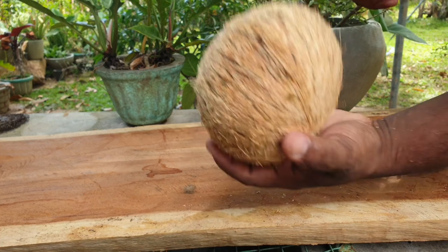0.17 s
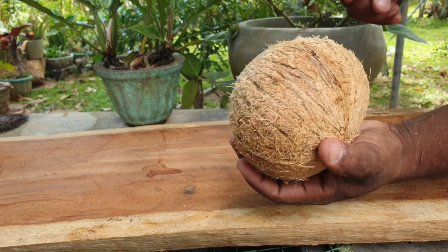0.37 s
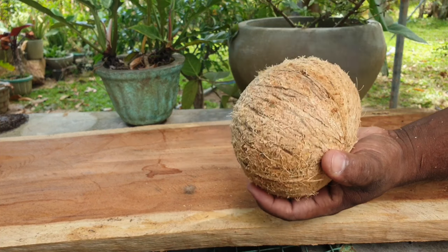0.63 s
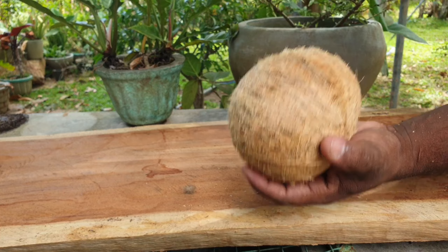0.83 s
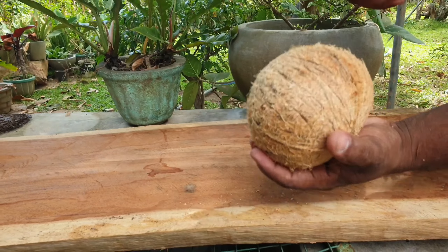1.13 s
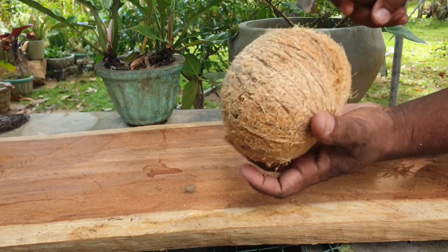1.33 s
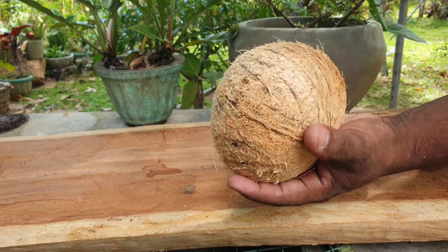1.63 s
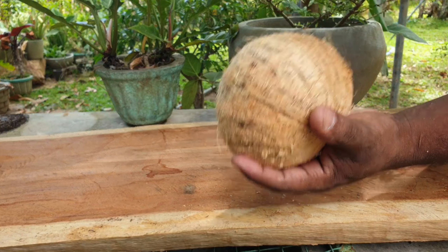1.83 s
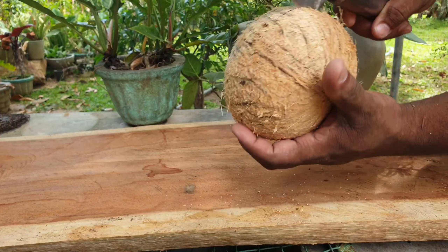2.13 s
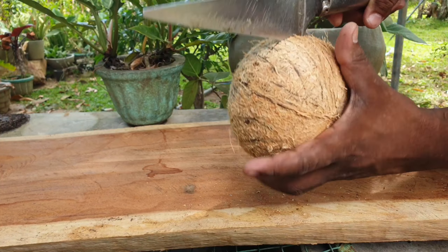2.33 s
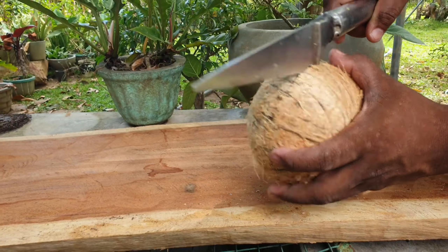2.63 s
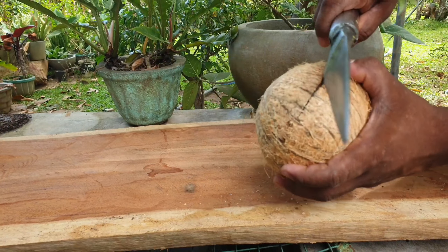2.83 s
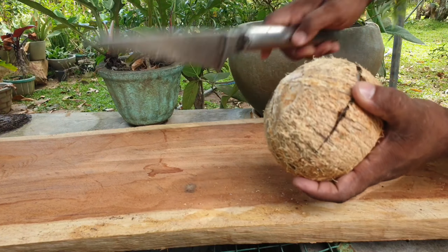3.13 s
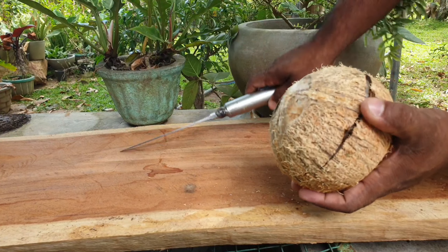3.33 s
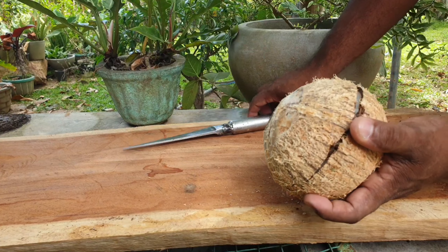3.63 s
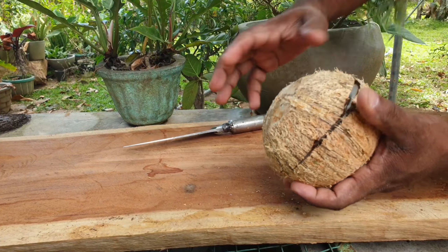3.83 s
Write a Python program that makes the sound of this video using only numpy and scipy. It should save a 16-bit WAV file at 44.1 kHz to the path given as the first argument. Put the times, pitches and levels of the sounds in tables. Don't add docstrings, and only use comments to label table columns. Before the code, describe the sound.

Two loud knife blows crack a coconut, followed by creaks, scrapes and a knife knocking on wood

```python
import sys
import numpy as np
from scipy import signal
from scipy.fft import rfft, irfft
from scipy.io import wavfile
from scipy.ndimage import uniform_filter1d

SR = 44100
rng = np.random.default_rng(int(sys.argv[2]) if len(sys.argv) > 2 else 0)


def digitize_waveform(pressure):
    field = np.atleast_2d(pressure).T
    bounded = np.clip(field, -1, 1)
    quanta = np.round(bounded * 32767).astype(np.int16)
    wavfile.write(sys.argv[1], SR, quanta)


def volts(x):
    e = np.asarray(x, float) / 20
    return 10 ** e


N = 176400

# pitch_hz, level_db
HUSH_COLOUR = [(30, -7), (65, 6.5), (130, 0), (300, -15.5), (2600, -24), (3500, -33.5), (6000, -26),
               (15000, -37)]
# time_s, level_db
LEAF_BREEZE = [
    (0, -1),
    (.5, -4),
    (.8, -2.5),
    (1.5, -0.5),
    (1.849, -3.5),
    (2.399, 0.5),
    (3.0, -2.5),
    (4.0, 4),
]
# start_s, length_s, level_db
ENGINE_SWELLS = [
    (-.05, 0.39, -46.5),
    (0.553, 0.25, -47),
    (1.122, 0.16, -48),
    (1.577, 0.13, -51),
    (1.791, 0.37, -45),
    (2.338, 0.29, -49.5),
    (2.938, 0.099, -47.5),
    (3.384, 0.14, -45),
]
# pitch_hz, level_db, t60_s
OLD_RINGING = [(315.5, -73, 0.117), (350, -71, .15), (775, -75.5, .08), (1823, -78.5, .05),
               (2343, -71, 0.077), (2610, -76.5, 0.037)]
# pitch_hz, level_db
EARLY_ECHO_COLOUR = [(100, -12.5), (500, -3), (1400, -7), (2500, -1.5), (6000, -3.5), (16000, -7)]
# pitch_hz, level_db
LATE_ECHO_COLOUR = [(100, -5.5), (350, -2), (900, -3.5), (1400, -9), (2400, -0.5), (4000, -3), (7000, -7.5),
                    (16000, -10.5)]
# start_s, length_s, level_db, pitch_hz
CREAKS = [
    (0.27, 0.042, -63, 620),
    (2.822, 0.081, -61, 640),
    (2.878, 0.064, -47, 657),
    (3.034, 0.027, -53.5, 582),
]
# start_s, crack_db, knock_db, contact_ms
AIM_TOUCH = (0.63, -46, -32.5, .12)
# pitch_hz, level_db, t60_s
AIM_TONES = [(322, -9, .2), (468.5, -9, .1), (620, 2, .035), (860, -8, 0.067), (1844, -17, .35),
             (2050, -9.5, .02), (2750, -22, .06), (5184, -19, .015), (6265, -17.5, .015)]
# start_s, length_s, level_db, pitch_hz
SCRAPES = [
    (0.641, 0.15, -67, 2750),
    (0.799, 0.19, -69, 2675),
    (1.582, .08, -70.5, 7080),
    (2.829, 0.14, -66, 2450),
    (3.469, 0.063, -47.5, 2180),
    (3.675, 0.25, -50, 8800),
    (2.299, 0.78, -70.5, 9010),
]
# start_s, level_db, pitch_hz
TICKS = [
    (0.917, -57, 3604),
    (1.501, -64, 6200),
    (1.588, -48, 9400),
    (2.7, -58, 10000),
    (2.754, -67.5, 9000),
    (2.933, -48, 5750),
    (3.209, -62, 10200),
    (3.23, -72, 10500),
]
# start_s, crack_db, shell_db, hollow_db, blade_db
BLOWS = [(.9865, -11.5, -25.5, -31.5, -31.5), (.9872, -9.5, -35.5, -39, -28.5),
         (.9949, -11, -21.5, -34.5, -33), (0.9967, -10, -27, -38, -36.5), (1.0012, -16, -31.5, -40, -42),
         (1.0032, -11, -29.5, -34, -41), (1.0066, -10.5, -33.5, -36.5, -40),
         (1.0105, -17.5, -35.5, -40, -42.5), (1.9802, -6.5, -24, -18, -39),
         (1.9812, -7.5, -29.5, -27.5, -41.5), (1.991, -13.5, -25.5, -33.5, -42),
         (2.0, -17, -30, -28.5, -43.5)]
# pitch_hz, level_db
CRACK_COLOUR = [(150, -12), (500, 3.5), (1200, -0.5), (2500, 6.5), (5000, 5.5), (10000, 3), (16000, -4.5)]
# pitch_hz, level_db, t60_s
SHELL_TONES = [(206, -12, 0.02), (302, -12, 0.07), (483.8, -6, 0.04), (603, -2.5, 0.021), (962, -2, 0.019),
               (1390, -5.5, 0.016), (2205, -10, 0.083), (2621, -3, .05)]
# pitch_hz, level_db, t60_s
HOLLOW_TONES = [(685.5, -1.5, 0.17), (726.4, -3, .08)]
# pitch_hz, level_db, t60_s
BLADE_TONES = [(786, -13, 0.32), (1840, -2, 0.32), (2310, -14.5, 0.35)]
# pitch_hz, level_db, t60_s
POT_TONES = [(178.1, -1.5, 0.3), (299.7, -5.5, .15), (344, -2, .2), (384.4, -3.5, 0.23)]
# start_s, crack_db, plank_db, knock_db, steel_db
TIP_TOUCHES = [
    (3.4655, -41, -53, -38.5, -39),
    (3.4985, -36.5, -50.5, -38.5, -55),
    (3.513, -53, -52, -43.5, -57),
    (3.525, -56, -50, -47.5, -54),
    (3.54, -55, -46.5, -46.5, -62),
    (3.555, -59, -51, -53, -60),
    (3.648, -71, -46, -65, -63),
    (3.657, -50.5, -53, -44, -58),
]
HANDLE_TOUCHES = [
    (3.6825, -45, -25.5, -18.5, -32.5),
    (3.695, -60, -37, -29, -56),
    (3.712, -57, -35, -25, -64),
    (3.735, -61.5, -37.5, -41, -63),
]
FLAT_TOUCHES = [
    (3.7935, -44, -39, -22, -52),
    (3.807, -39, -36.5, -28.5, -51),
    (3.826, -56, -30.5, -37.5, -71),
    (3.848, -57, -37.5, -36.5, -67),
    (3.905, -55, -38, -41.5, -60),
    (3.915, -55.5, -34.5, -40.5, -53),
]
# pitch_hz, level_db, t60_s
TIP_TONES = [(494, -3, .1), (1168, -11, .08), (1322, 2.5, 0.11), (1597, -6, 0.052), (2190, -4.5, 0.044),
             (2370, -2, 0.046), (3381, -12, 0.058), (4350, -13, 0.018), (5750, -3.5, 0.034),
             (6412, -6, .03)]
# pitch_hz, level_db, t60_s
HANDLE_TONES = [(742, 3, 0.14), (869.5, -15.5, .4), (1053, -17, .1), (1190, -20, .1), (1297, -8, 0.078),
                (1606, -15, .1), (2325, -25.5, 0.085), (3760, -30, .15), (5114, -24, 0.09),
                (6245, -31.5, .2)]
# pitch_hz, level_db, t60_s
FLAT_TONES = [(648, -4.5, .1), (770, -2, 0.11), (866, -11, 0.79), (945, 1.5, 0.061), (1140, -3.5, .03),
              (1368, 0, 0.043), (1626, -2.5, 0.092), (1910, -5.5, 0.029), (2210, -18.5, .06),
              (2340, -4, 0.019), (3680, -24, .1)]
# pitch_hz, level_db, t60_s, left_minus_right_db
PLANK_TONES = [(145.1, -1, 0.85, -9.5), (204.4, -10, 0.77, -4), (252, -3.5, 0.077, -3), (301, -3, 0.3, -12),
               (409, -11.5, 0.24, -12), (528.5, -7.5, 0.082, 11.5)]
# pitch_hz, level_db, t60_s
STEEL_TONES = [(1810, -15, 0.51), (3021, -12, 0.56), (4750, -24, 1.2)]
# level_db, t60_s
AIM_CHATTER = (-36, 0.061)
NUT_CHATTER = (-27.5, 0.084)
PLANK_CHATTER = (-30, 0.15)
STEEL_CHATTER = (-32.5, 0.053)
# pitch_hz, level_db
MIC_COLOUR = [(30, -5.5), (200, -3.5), (6300, -4.5), (7200, -14.5), (8300, -20.5), (10600, -3),
              (13000, -12.5), (16500, -18.5)]
# pitch_hz, left_minus_right_db
PORT_COLOUR = [(60, -4), (200, 1.5), (700, 1.5), (1300, 7.5), (2400, 4.5), (4400, 9), (9000, 5.5),
               (15000, -5)]

HUSH_DB, ALIKE_HZ, ENGINE_HZ = -55.5, 505, 63
EARLY_DB, EARLY_T60_S, LATE_DB, LATE_T60_S, ONSET_S = -26, 0.19, -41, 0.54, 0.0015
OLD_RINGING_T60_S, CRACK_T60_S = 0.56, 0.0056
POTS_DB, POTS_T60_S = -81, 0.79
TIP_MS, HANDLE_MS, FLAT_MS = 0.11, 0.21, 0.3
THUD_DB, THUD_LOW_HZ, THUD_HIGH_HZ = 20.5, 120, 882
TOP_HZ = 16500


def read(table, hz):
    t = np.array(table, float)
    return np.interp(np.log(np.maximum(hz, 1)), np.log(t[:, 0]), t[:, 1])


def colour(x, table, scale=1):
    log_gain = scale * read(table, np.linspace(0, SR / 2, 2049)) * np.log(10) / 20
    cepstrum = irfft(log_gain)
    cepstrum[1:2048] *= 2
    cepstrum[2049:] = 0
    h = irfft(np.exp(rfft(cepstrum)))[:2048]
    h = h.reshape((1,) * (x.ndim - 1) + (-1,))
    return signal.fftconvolve(x, h, axes=-1)[..., :x.shape[-1]]


def fade(t60, size):
    return volts(-60 * np.arange(size) / SR / t60)


def add(out, s, x):
    i = int(round(s * SR))
    x = x[:, max(-i, 0):N - i]
    out[:, max(i, 0):max(i, 0) + x.shape[1]] += x


def lowpass(x, hz):
    return signal.lfilter(*signal.butter(2, min(hz, 18000), fs=SR), x)


def pair(size):
    x = rng.standard_normal((3, size))
    return x[0] + 1.2 * signal.lfilter(*signal.butter(1, 700, "hp", fs=SR), x[1:])


def ring(modes, x):
    out, first = np.zeros(x.shape), np.argmax(x[0] != 0)
    for m in modes:
        hz, db, t60 = m[:3]
        r, w = np.exp(-np.log(1000) / (t60 * SR)), 2 * np.pi * hz / SR
        lean_db = np.array([[.5], [-.5]]) * (m[3] if len(m) > 3 else 0)
        drive = x[:, first:] + 1e-18
        tone = signal.lfilter([0, np.sin(w)], [1, -2 * r * np.cos(w), r * r], drive)
        out[:, first:] += volts(db + lean_db) * tone
    return out


def push(db, contact_ms, chatter):
    chatter_db, chatter_t60 = chatter
    x = pair(size=8192) * volts(chatter_db) * fade(chatter_t60, size=8192)
    x[:, 0] += 1
    return volts(db) * lowpass(x, 700 / contact_ms)


def crack(db, contact_ms):
    x = pair(size=2048) * fade(CRACK_T60_S, size=2048)
    energy = np.sum(x ** 2, axis=1, keepdims=True)
    x = colour(x / np.sqrt(energy) * 7, CRACK_COLOUR)
    return volts(db) * lowpass(x, 1300 / contact_ms)


def burst(length, hz, width, grain_db):
    n = int(length * SR)
    grains_db = grain_db * np.repeat(rng.standard_normal(SR // 100), 100)
    x = rng.standard_normal((2, SR)) * volts(grains_db)
    band = [hz / (1 + width), min(hz * (1 + width), 20000)]
    x = signal.sosfilt(signal.butter(2, band, "bp", fs=SR, output="sos"), x)[:, :n]
    return x / x.std() * np.sin(np.pi * np.arange(n) / n) ** .7


def walk(rate):
    k = int(SR / rate)
    steps = np.repeat(rng.standard_normal(N // 500), k)[:N]
    return 1.3 * uniform_filter1d(uniform_filter1d(steps, k), k)


def hush():
    hz = np.fft.rfftfreq(N, 1 / SR)
    breeze_db = np.interp(np.arange(N) / SR, *np.array(LEAF_BREEZE).T)
    noise = rfft(rng.standard_normal((3, N)), axis=1) * volts(read(HUSH_COLOUR, hz))
    alike = 1 / (1 + (hz / ALIKE_HZ) ** 2)
    noise = np.sqrt(alike) * noise[0] + np.sqrt(1 - alike * .9) * noise[1:]
    out = 0
    for centre_hz, depth_db in zip(2. ** np.arange(4, 15), np.linspace(3.5, 1.2, num=11)):
        octave = np.clip(1 - abs(np.log2(np.maximum(hz, 1) / centre_hz)), 0, 1)
        level_db = depth_db * walk(3) + (centre_hz > 700) * breeze_db
        out = out + irfft(noise * octave, N) * volts(level_db)
    return volts(HUSH_DB) * out / out.std()


def engine():
    t, swell = np.arange(N) / SR, 0
    for s, length, db in ENGINE_SWELLS:
        swell = swell + volts(db) * np.sin(np.pi * np.clip((t - s) / length, 0, 1)) ** 0.14
    pitch = ENGINE_HZ * (1 + .04 * walk(13))
    return swell * np.sin(2 * np.pi * np.cumsum(pitch) / SR)


def old_ringing():
    return ring(OLD_RINGING, pair(size=N) * fade(OLD_RINGING_T60_S, size=N))


def tail(early_db, late_db, size):
    x = rng.standard_normal((2, 2, size))
    early = colour(x[0] * fade(EARLY_T60_S, size), EARLY_ECHO_COLOUR)
    late = colour(x[1] * fade(LATE_T60_S, size), LATE_ECHO_COLOUR)
    return volts(early_db) * early + volts(late_db) * late


def porch(x):
    onset = 1 - np.exp(-np.arange(SR) / SR / ONSET_S)
    h = tail(EARLY_DB, LATE_DB, size=SR) * onset
    return signal.fftconvolve(x, h, axes=1)[:, :N]


def prying():
    out = np.zeros((2, N))
    for s, length, db, hz in CREAKS:
        add(out, s, volts(db) * burst(length, hz, 0.11, 10.6))
    return out


def taking_aim():
    out, drive = np.zeros((2, 2, N))
    s, crack_db, knock_db, contact_ms = AIM_TOUCH
    add(out, s, crack(crack_db, contact_ms))
    add(drive, s, push(knock_db, contact_ms / 2, AIM_CHATTER))
    return out + ring(AIM_TONES, drive)


def scraping():
    out = np.zeros((2, N))
    for s, length, db, hz in SCRAPES:
        width = .05 if s < 1 else .9
        add(out, s, volts(db) * burst(length, hz, width, 3))
    return out


def ticking():
    out = np.zeros((2, N))
    for s, db, hz in TICKS:
        add(out, s, volts(db) * burst(.005, hz, .7, 3))
    return out


def pots(cracks):
    echoes = pair(size=SR) * fade(POTS_T60_S, size=SR)
    drive = signal.fftconvolve(cracks, echoes, axes=1)[:, :N]
    return volts(POTS_DB) * ring(POT_TONES, drive)


def blows():
    cracks, shell, hollow, blade = np.zeros((4, 2, N))
    for s, crack_db, shell_db, hollow_db, blade_db in BLOWS:
        contact_ms = 0.08 + 0.01 * min(crack_db + 10, 0)
        add(cracks, s, crack(crack_db, contact_ms))
        add(shell, s, push(shell_db, contact_ms, NUT_CHATTER))
        add(hollow, s, push(hollow_db, contact_ms, NUT_CHATTER))
        add(blade, s, push(blade_db, contact_ms, NUT_CHATTER))
    nut = ring(SHELL_TONES, shell) + ring(HOLLOW_TONES, hollow)
    return cracks + nut + ring(BLADE_TONES, blade) + pots(cracks)


def laying():
    out, plank, steel = np.zeros((3, 2, N))
    ways = ((TIP_TOUCHES, TIP_MS, TIP_TONES), (HANDLE_TOUCHES, HANDLE_MS, HANDLE_TONES),
            (FLAT_TOUCHES, FLAT_MS, FLAT_TONES))
    for touches, contact_ms, tones in ways:
        knock = np.zeros((2, N))
        for s, crack_db, plank_db, knock_db, steel_db in touches:
            add(out, s, crack(crack_db, contact_ms))
            add(plank, s, push(plank_db, contact_ms, PLANK_CHATTER))
            add(knock, s, push(knock_db, contact_ms / 2, STEEL_CHATTER))
            add(steel, s, push(steel_db, contact_ms / 2, STEEL_CHATTER))
        out = out + ring(tones, knock)
    thud = signal.lfilter(*signal.butter(1, [THUD_LOW_HZ, THUD_HIGH_HZ], "bp", fs=SR), plank)
    return out + ring(PLANK_TONES, plank) + ring(STEEL_TONES, steel) + volts(THUD_DB) * thud


def scene():
    near = old_ringing() + prying() + taking_aim() + scraping() + ticking() + blows() + laying()
    near = signal.lfilter(*signal.butter(2, 110, "hp", fs=SR), near)
    out = near + porch(near) + hush() + engine()
    add(out, 0, tail(-30, -31.0, size=SR))
    return out


def low_pass(x):
    return signal.sosfilt(signal.butter(12, 16880, fs=SR, output="sos"), x)


def record(dry):
    x = colour(dry, MIC_COLOUR)
    x = np.array([colour(x[0], PORT_COLOUR, 0.5), colour(x[1], PORT_COLOUR, -0.71)])
    x = np.clip(x, -.97, .97)
    mix = signal.sosfilt(signal.ellip(8, .2, 70, TOP_HZ, fs=SR, output="sos"), x)
    return low_pass(mix)


dry = scene()
out = record(dry)
digitize_waveform(out)
```